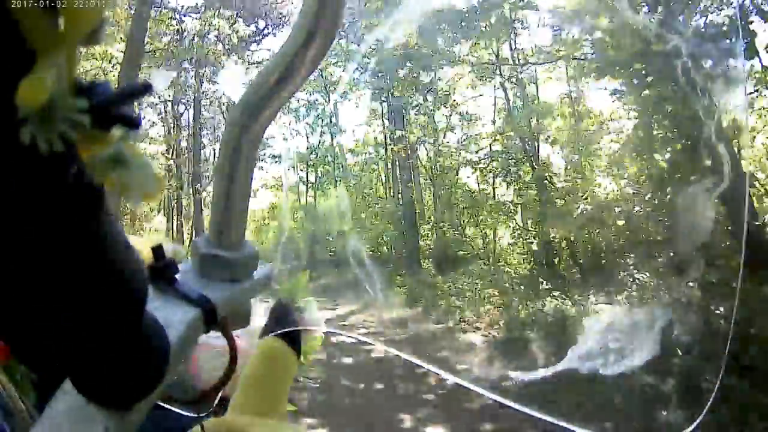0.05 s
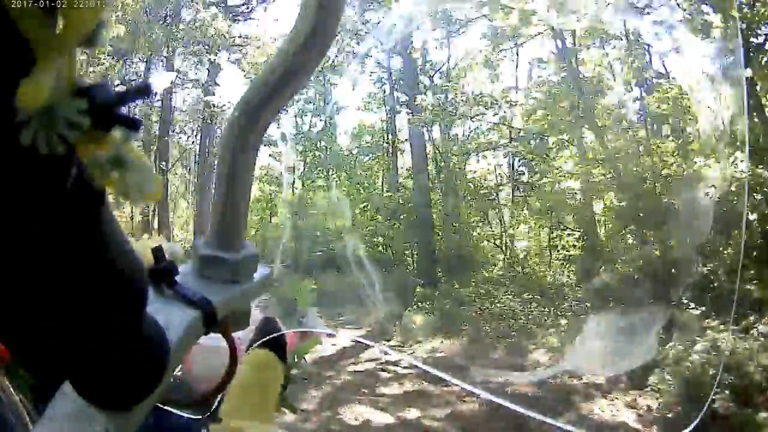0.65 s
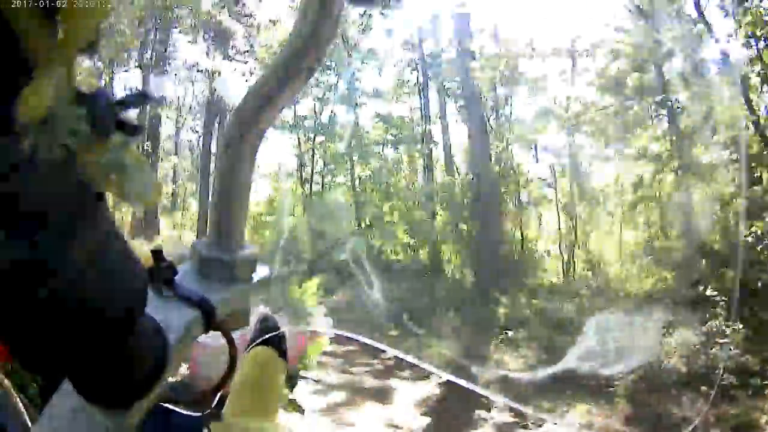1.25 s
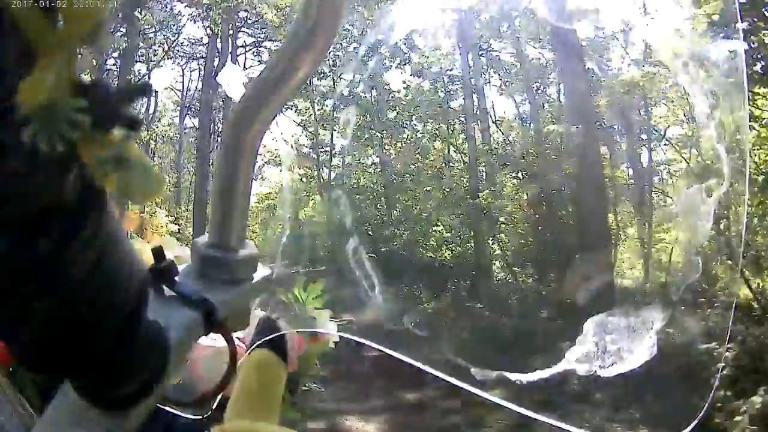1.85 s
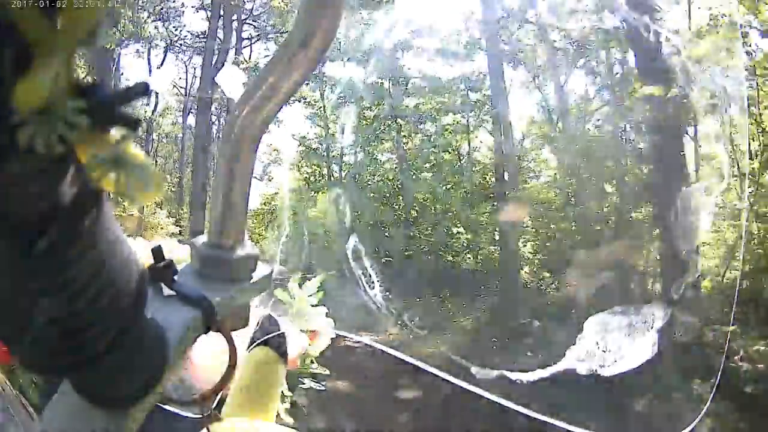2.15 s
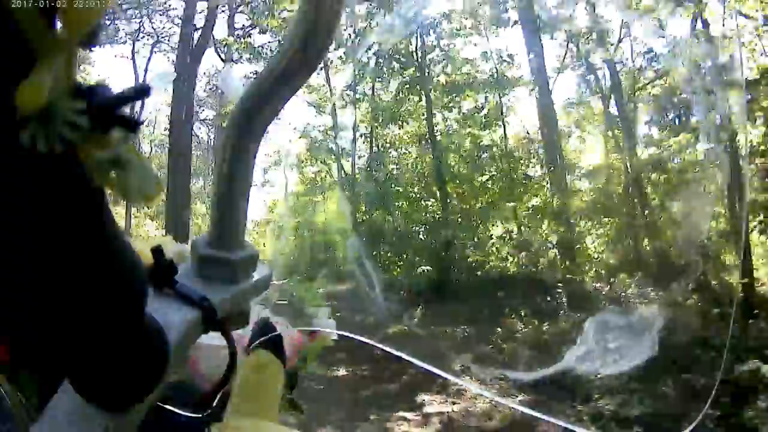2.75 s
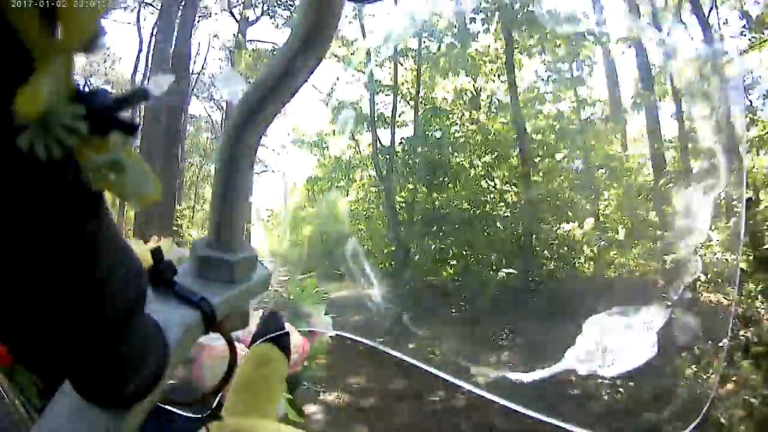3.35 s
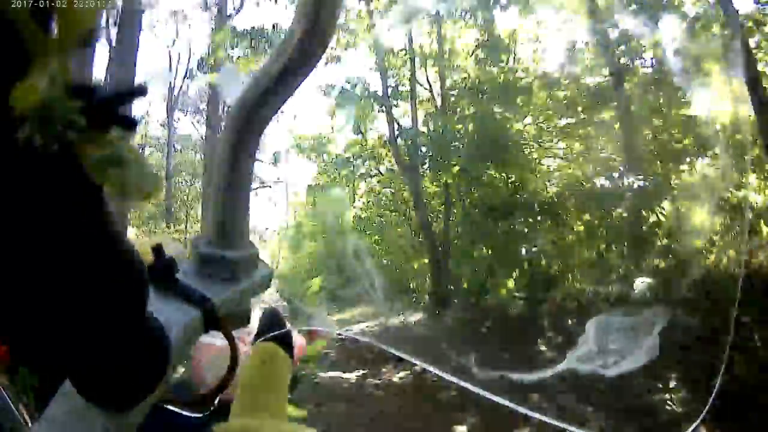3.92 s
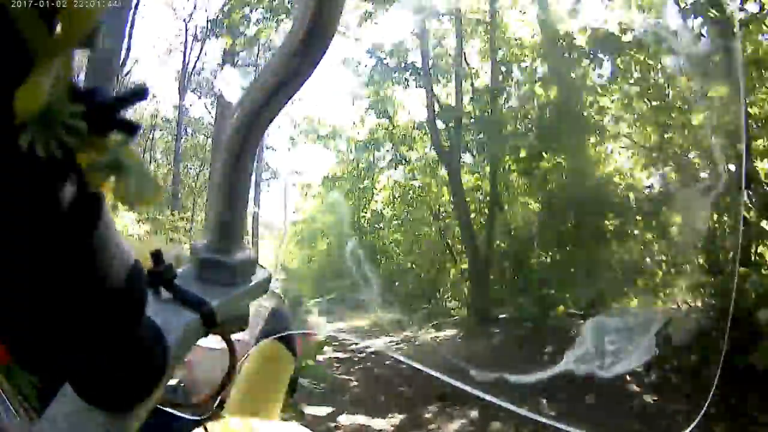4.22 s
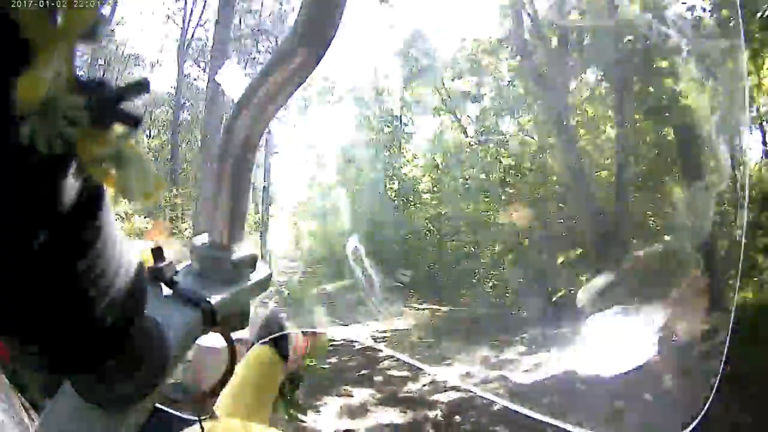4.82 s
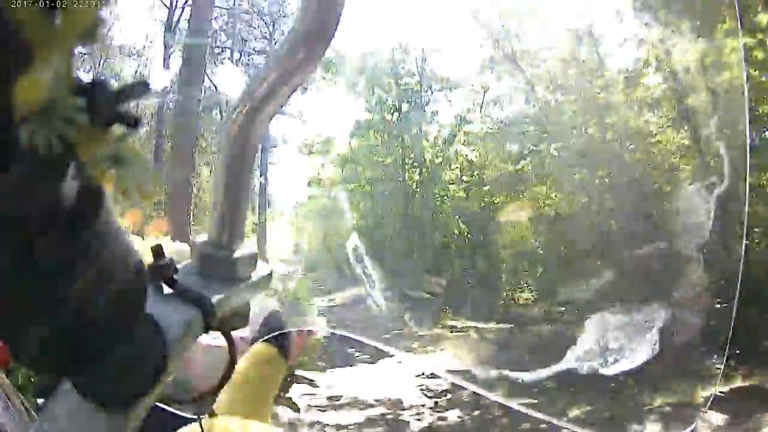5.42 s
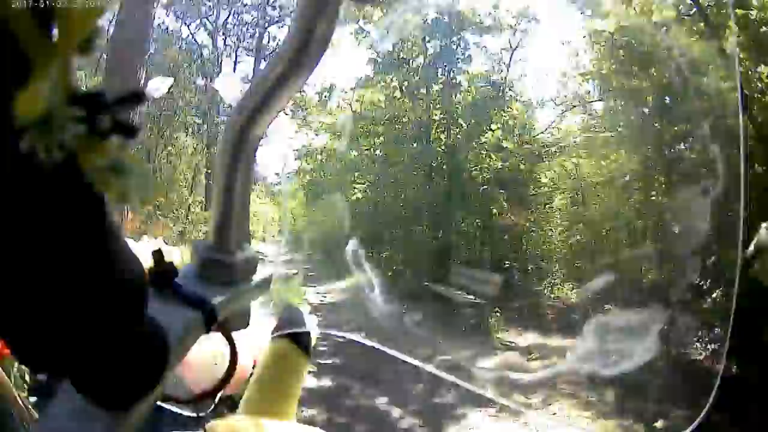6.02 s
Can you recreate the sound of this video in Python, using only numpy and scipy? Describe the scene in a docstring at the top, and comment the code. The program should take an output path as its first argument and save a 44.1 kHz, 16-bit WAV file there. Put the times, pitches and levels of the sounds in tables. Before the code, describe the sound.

A light vehicle rumbles and knocks over a bumpy dirt track while a cuckoo calls and small birds chirp faintly in the woods.

```python
"""A wood heard from a light vehicle on a dirt track. Songbirds whistle over a low rumble from the start,
and at 1 s a cuckoo hoots its two falling notes. From about 2 s bumps shake the frame into dull knocks
while the tyres hiss and flick grit. The cuckoo calls again near 4 s, amid a second run of jolts.
After 5 s the ride calms, a near bird sings and the cuckoo begins a third call.
Throughout, scattering by the trees gives each call a soft tail."""
import sys
import numpy as np
from scipy import signal
from scipy.fft import rfft, irfft
from scipy.io import wavfile
from scipy.ndimage import uniform_filter1d

SR = 44100
rng = np.random.default_rng(int(sys.argv[2]) if len(sys.argv) > 2 else 0)


def digitize_waveform(pressure):
    """Quantize a signal to 16-bit integers and store it at the path in sys.argv[1].

    Rows of a 2-D input are taken as channels; values are limited to [-1, 1].
    """
    field = np.atleast_2d(pressure).T
    bounded = np.clip(field, -1, 1)
    quanta = np.round(bounded * 32767).astype(np.int16)
    wavfile.write(sys.argv[1], SR, quanta)


N = 272097
TIME = np.arange(N) / SR

# hardest jolts of the frame: (time [s], relative peak [dB], centre frequency [Hz], shudder level [dB])
JOLTS = [(0.343, -39, 106, -44.5), (.749, -41, 104, -62), (1.41, -39, 130, -38.5), (1.734, -33, 101, -42.5),
         (1.908, -28.5, 185, -32.5), (1.978, -32, 151, -43), (2.128, -28.5, 137, -57),
         (2.222, -21.5, 180, -32), (2.248, -18.5, 256, -32), (2.275, -18.5, 170, -30),
         (2.332, -16, 255, -37), (2.345, -23.5, 220, -47), (2.473, -17, 190, -25), (2.496, -12, 183, -27.5),
         (2.506, -12, 237, -38), (2.594, -25, 157, -34), (2.617, -26, 145, -26.5),
         (2.781, -17.5, 195, -23.5), (2.856, -28, 130, -28.5), (2.935, -6, 207, -43),
         (3.029, -25, 179, -31), (3.086, -29.5, 120, -60), (3.262, -35.5, 136, -45),
         (3.39, -35.5, 107, -57), (3.435, -38.5, 105, -61), (3.806, -31.5, 191, -30),
         (3.833, -20.5, 166, -26), (3.872, -14.5, 183, -29.5), (3.99, -19, 184, -51),
         (4.001, -14, 212, -31.5), (4.05, -26.5, 117, -34), (4.246, -21, 122, -39), (4.261, -22, 230, -38),
         (4.273, -15.5, 182, -31), (4.288, -13.5, 132, -19), (4.37, -20, 147, -41), (4.478, -19, 149, -28),
         (4.555, -22.5, 161, -30), (4.58, -19.5, 157.7, -48), (4.677, -21.5, 124, -31.5),
         (4.751, -15, 184, -22), (4.82, -18.5, 232, -31), (4.831, -16, 129, -39), (5.262, -38.5, 113, -41),
         (5.434, -36.5, 98, -46), (5.755, -30, 97, -61), (6.007, -29.5, 126, -59)]


def cuckoo(waver=0.01, stop_s=0.012, echo_db=-13.5):
    """Nearly pure tones under slight frequency modulation: an arched 'cuck', then a lower, level 'oo'."""
    # (time [s], length [s], top pitch [Hz], sag at the ends [fraction], level [dB], swell [s])
    hoots = [(1.024, 0.1, 660.4, 0.2, -42.5, 0.034), (1.283, 0.18, 531.8, 0.026, -39, 0.066),
             (3.759, 0.089, 639, 0.14, -41.5, 0.068), (4.02, 0.17, 525, 0.013, -44.5, 0.033),
             (5.968, 0.094, 652, 0.074, -44, 0.069)]
    out = np.zeros(N)
    for s, length, top_hz, sag, db, swell in hoots:
        t = TIME[:round(length * SR)]
        arch = 1 - sag * abs(2 * t / length - 1) ** 3
        hz = top_hz * arch * (1 + waver * drift(45)[:len(t)])
        add(out, s, gain_of(db) * tone(hz) * fades(t, length, swell, stop_s))
    return out + gain_of(echo_db) * scatter(out, t60=.7, build_s=.005)


def song_notes():
    """Pitch contours by kind: (time [s], length [s], start, middle, end pitch [Hz], relative level [dB])."""
    # a chatterer's upward sweeps and soft arched chips: (time [s], relative level [dB])
    rasps = [(.832, -68.5), (.926, -67.5), (1.102, -67.5), (1.2, -66.5), (1.507, -63.5), (1.758, -64),
             (1.85, -59.5), (2.095, -65.5), (2.209, -63.5), (5.895, -56.5)]
    chips = [(1.396, -68), (3.89, -70), (4.125, -69), (4.39, -66)]
    # very high calls and a warbler's slurs:
    # (time [s], length [s], start pitch [Hz], end pitch [Hz], relative level [dB])
    high_calls = [(0.102, 0.091, 6780, 6810, -68), (0.453, .19, 7140, 6820, -70.5),
                  (1.382, 0.038, 6600, 6700, -70), (3.33, 0.11, 6980, 6590, -66.5),
                  (3.947, 0.12, 7000, 6230, -64.5), (4.422, 0.062, 7840, 6450, -64),
                  (4.644, 0.083, 7740, 6750, -60.5), (5.701, 0.083, 7980, 6700, -62.5)]
    slurs = [(4.746, 0.062, 2430, 3520, -61), (4.879, 0.09, 3057, 2830, -60.5),
             (4.944, .055, 2500, 2850, -62), (5.077, 0.048, 3060, 2565, -58.5),
             (5.149, 0.0586, 2427, 2853, -57.5), (5.345, 0.066, 2500, 2970, -63),
             (5.58, 0.023, 3380, 2040, -59.5), (5.754, 0.0256, 4570, 3510, -57.5)]
    # sagging whistles: (time [s], length [s], pitch [Hz], relative level [dB])
    whistles = [(0.021, 0.13, 4300, -66.5), (.042, 0.056, 2414, -63), (0.12, 0.1, 4930, -71.5),
                (0.312, 0.082, 3610, -68.5), (0.577, 0.059, 3550, -67.5), (0.817, .06, 6100, -75),
                (1.063, 0.078, 4310, -64), (1.17, 0.06, 5450, -76.5), (1.217, 0.058, 4610, -68),
                (2.159, 0.04, 5000, -63.5), (2.366, 0.08, 4440, -63.5), (2.749, 0.059, 4730, -64.5),
                (3.016, .11, 3970, -72.5), (3.949, .072, 4660, -66.5), (4.51, 0.075, 4610, -71),
                (4.858, 0.088, 4000, -66.5), (5.609, 0.059, 4790, -62.5)]
    # flicks down and back after a thin lead-in: (time [s], lead-in length [s], relative level [dB])
    flicks = [(0.831, 0.05, -59), (1.557, .008, -61), (1.918, 0.056, -62), (3.358, 0.024, -58),
              (3.766, 0.0089, -64.5), (4.13, .008, -61)]
    # the near bird's held top note, dip and loud low landing:
    # (time [s], top pitch [Hz], hold [s], landing length [s], landing pitch [Hz], relative level [dB])
    phrases = [(5.85, 5320, .028, 0.049, 3764, -50), (6.037, 5520, 0.0405, 0.088, 3636, -48.5)]
    dip_s, dip_hz, sag = .03, 4400, 0.0346
    hooks, motifs = [], []
    for s, lead, db in flicks:
        hooks += [(s - lead, lead, 4640, 4860, 4800, db - 4.5), (s, 0.0316, 5100, 4480, 4630, db)]
    for s, top_hz, hold, landing, low_hz, db in phrases:
        motifs += [(s, hold, top_hz, top_hz, top_hz, db - 7),
                   (s + hold, dip_s, top_hz, dip_hz, (top_hz + dip_hz) / 2, db - 3.5),
                   (s + hold + dip_s, landing, 3980, low_hz, low_hz - 25, db)]
    return {"rasp": [(s, .034, 2408, 2880, 3650, db) for s, db in rasps],
            "chip": [(s, 0.04, 2290, 2600, 2290, db) for s, db in chips],
            "high": [(s, length, start, end + 0.3 * (start - end), end, db)
                     for s, length, start, end, db in high_calls],
            "warble": [(s, length, start, (start + end) / 2, end, db)
                       for s, length, start, end, db in slurs],
            "whistle": [(s, length, hz * (1 + sag), hz, hz * (1 - sag), db)
                        for s, length, hz, db in whistles],
            "hook": hooks, "motif": motifs}


def songbirds(flutter_db=3, leaves_db=-7.5, wood_db=-4.0):
    """Gliding tones, randomly modulated in pitch and level, arrive directly and by scattering."""
    # kind of call: (pitch jitter [Hz], direct-path gain [ratio])
    voices = {"rasp": (384, 0.64), "chip": (210, 0.65), "high": (120, 0.43), "warble": (51, 0.55),
              "whistle": (129, 0.58), "hook": (38, 0.53), "motif": (68, .55)}
    sung, direct = np.zeros((2, N))
    jitter, flutter = drift(230), drift(83)
    for kind, notes in song_notes().items():
        jitter_hz, direct_gain = voices[kind]
        for s, length, start_hz, middle_hz, end_hz, db in notes:
            t = TIME[:round(length * SR)]
            u = t / length
            bend = 4 * u * (1 - u) * (middle_hz - (start_hz + end_hz) / 2)
            hz = start_hz + (end_hz - start_hz) * u + bend + jitter_hz * np.interp(s + t, TIME, jitter)
            level = gain_of(db + flutter_db * np.interp(s + t, TIME, flutter))
            chirp = level * fades(t, length, .35 * length, .15 * length) * tone(hz)
            add(sung, s, chirp)
            add(direct, s, direct_gain * chirp)
    leaves = gain_of(leaves_db) * scatter(sung, t60=0.11, build_s=0.0014)
    wood = gain_of(wood_db) * scatter(sung, t60=0.61, build_s=0.01)
    return gain_of(1.25) * (direct + leaves + wood)


def knocks(ring=2.46, muffle_hz=1000, bump_db=-11, bump_gap_s=0.00547, size=4096):
    """Impact: each jolt radiates a rounded pressure pulse amid four smaller bumps of the loose frame."""
    out, hz = np.zeros(N), np.fft.rfftfreq(size, 1 / SR)
    slots = (-1, 1, 2, 3)  # one bump before the pulse, three after
    for s, db, centre_hz, _ in JOLTS:
        slips, phases = rng.random((2, len(slots)))
        spectrum = (hz / centre_hz) ** ring * np.exp(-(ring + .5) * hz / centre_hz)
        spectrum /= np.sqrt(1 + (hz / muffle_hz) ** 10)
        pulse = np.fft.fftshift(np.fft.ifft(spectrum, size))  # complex, so its phase can be turned
        pulse *= gain_of(db) / abs(pulse).max()
        start = s - size / 2 / SR
        add(out, start, (pulse * np.exp(2j * np.pi * phases.sum())).real)
        for slot, slip, phase in zip(slots, slips, phases):
            bump = (pulse * np.exp(2j * np.pi * phase)).real
            delay = bump_gap_s * (slot + .5 * (slip - .5))
            add(out, start + delay, gain_of(bump_db) / abs(slot) * bump)
    return gain_of(2.5) * out


def rumble(lumpy_db=2.5, t60=0.34, rise_s=0.015):
    """Forced vibration of the frame by the track adds in power to a damped shudder after each jolt."""
    # shaking by the rough track: (time [s], relative level [dB])
    shaking = [(0, -48.5), (.2, -57), (1.2, -58.5), (1.45, -42), (1.62, -56.5), (1.9, -38), (2.07, -58),
               (2.19, -38.5), (2.4, -41), (2.65, -41), (3.07, -36), (3.18, -55.5), (3.55, -55.5),
               (3.79, -43), (3.95, -63), (4.24, -33), (4.55, -35.5), (4.63, -47), (4.7, -28.5), (5.15, -60),
               (5.33, -52), (5.95, -46), (6.17, -58)]
    # frame vibration: (frequency [Hz], relative spectral density [dB])
    spectrum = [(20, -39), (45, -20), (80, 3.5), (120, 3.5), (200, -6.5), (300, -15.5), (450, -24.5),
                (650, -33), (1000, -42), (2000, -58), (6000, -105)]
    power, t = (gain_of(-1.74) * follow(shaking)) ** 2, TIME[:SR // 2]
    for s, _, _, db in JOLTS:
        shudder = np.minimum(t / rise_s, 1) * gain_of(db - 60 * t / t60)
        add(power, s - rise_s, shudder ** 2)
    vibration = noise(spectrum, patchy_db=2.5) * gain_of(lumpy_db * drift(35))
    return np.sqrt(power) * unit_rms(vibration)


def tyres(grainy_db=1.24):
    """Crushing noise: sand and dry leaves under the tread give a fine, grainy hiss."""
    # strength of the hiss: (time [s], relative level [dB])
    hiss_levels = [(0.0, -79.5), (0.95, -81.5), (1.75, -82), (2.23, -74.5), (2.39, -68.5), (2.89, -72.5),
                   (3.14, -78.5), (3.78, -80.5), (4.59, -71.5), (5.22, -82), (6.17, -81)]
    # tread on dirt: (frequency [Hz], relative spectral density [dB])
    spectrum = [(300, 7.5), (1100, 14.5), (1500, 10), (2100, -2.5), (3000, -0.5), (5000, -1.5), (7000, 4),
                (9500, 4.5), (11000, -6), (12500, -7), (16000, -16)]
    hiss = noise(spectrum, patchy_db=1.6) * gain_of(grainy_db * drift(300))
    return gain_of(9.5) * follow(hiss_levels) * unit_rms(hiss)


def grit(rise_s=0.00067, dull_hz=10500):
    """Grit and twigs under the tyres give transients: bands of noise that decay exponentially."""
    # (time [s], level [dB], centre frequency [Hz], width [octaves], 60 dB decay time [s])
    scuffs = [(.163, -56, 10500, 0.27, 0.019), (2.42, -54.5, 4020, 1.9, 0.11),
              (2.553, -52, 1300, 0.73, 0.023), (2.779, -54, 9050, 0.37, 0.084),
              (2.957, -57.5, 5850, 1.03, 0.33), (3.038, -42.5, 8640, 0.22, 0.0066),
              (4.331, -50.5, 6600, 1.5, 0.062), (4.555, -72, 5000, 1.2, 0.027)]
    out, t = np.zeros(N), TIME[:SR // 2]
    hz = np.fft.rfftfreq(len(t), 1 / SR)
    for s, db, centre_hz, octaves, t60 in scuffs:
        band = np.exp(-.5 * (np.log2((hz + 1) / centre_hz) / octaves) ** 2) / np.sqrt(hz + 1)
        band /= np.sqrt(1 + (hz / dull_hz) ** 12)  # the microphone is dull at the very top
        snap = unit_rms(irfft(rfft(rng.standard_normal(len(t))) * band, len(t)))
        add(out, s, snap * gain_of(db - 60 * t / t60) * np.minimum(t / rise_s, 1))
    return out


def chorus():
    """Incoherent summation: far-off birds merge into a haze of high noise."""
    # strength of the haze: (time [s], level [dB])
    haze_levels = [(0, -76), (1.3, -72.5), (2.2, -74), (3.5, -79.5), (6.17, -71)]
    # distant song: (frequency [Hz], relative spectral density [dB])
    spectrum = [(1800, -38), (2400, -25), (3400, -7.5), (4400, 1), (5100, -10), (8000, -33.5)]
    return follow(haze_levels) * noise(spectrum, patchy_db=4.5)


def air(level_db=-58):
    """Broadband ambient noise: the soft, steady rush of the wood."""
    # (frequency [Hz], relative spectral density [dB])
    spectrum = [(30, 4.5), (100, -3), (250, -3.5), (450, -4.5), (750, -15), (1080, -10), (1450, -19.5),
                (2000, -26.5), (2800, -26.5), (5600, -29), (9000, -52), (11500, -39), (16000, -35)]
    return gain_of(level_db) * noise(spectrum, patchy_db=1.0)


def scatter(x, t60, build_s):
    """Multiple scattering: trunks and leaves return a cloud of echoes that builds up and dies away."""
    t = TIME[:SR]
    echoes = rng.standard_normal(SR) * (rng.random(SR) < .06)
    echoes *= gain_of(-60 * t / t60) * (1 - np.exp(-t / build_s))
    return signal.fftconvolve(x, echoes / np.linalg.norm(echoes))[:N]


def noise(spectrum, patchy_db):
    """Spectrally shaped noise of rms 1 whose level wanders in patches of time and frequency."""
    hz = np.fft.rfftfreq(2048, 1 / SR)
    real, imag, patches = rng.standard_normal((3, N // 512 + 5, len(hz)))
    patches = unit_rms(uniform_filter1d(uniform_filter1d(patches, size=7, axis=0), size=18, axis=1))
    knots_hz, knots_db = np.transpose(spectrum)
    colour_db = np.interp(np.log(hz + 1), np.log(knots_hz), knots_db)
    frames = (real + 1j * imag) * gain_of(colour_db + patchy_db * patches)
    return unit_rms(signal.istft(frames.T, nperseg=2048, noverlap=1536)[1][:N])


def drift(rate_hz):
    """Random fluctuation: low-passed noise of rms 1."""
    hz = np.fft.rfftfreq(N, 1 / SR)
    return unit_rms(irfft(rfft(rng.standard_normal(N)) * np.exp(-(hz / rate_hz) ** 2), N))


def tone(hz):
    """A sinusoid of rms 1 whose phase is the integral of frequency."""
    return unit_rms(np.sin(2 * np.pi * np.cumsum(hz) / SR))


def fades(t, length, rise, fall):
    """Amplitude envelope with quarter-sine attack and release."""
    attack = np.sin(np.pi / 2 * np.clip(t / rise, 0, 1))
    release = np.sin(np.pi / 2 * np.clip((length - t) / fall, 0, 1))
    return attack * release


def follow(curve):
    """Interpolates (time [s], level [dB]) to a gain for every sample."""
    return gain_of(np.interp(TIME, *np.transpose(curve)))


def gain_of(db):
    """Decibels to amplitude."""
    return 10 ** (np.asarray(db) / 20)


def unit_rms(x):
    """Normalises to rms 1."""
    return x / np.sqrt(np.mean(x ** 2) + 1e-20)


def add(mix, s, sound):
    """Superposes a sound on the mix at time s."""
    part = mix[max(0, round(s * SR)):][:len(sound)]
    part += sound[:len(part)]


def scene():
    """Superposition of the wood, its birds and the rolling vehicle in one channel."""
    background = air() + chorus()
    return (cuckoo() + songbirds() + knocks() + rumble() + tyres() + grit() + background)[None]


def record(dry, low_cut_hz=42, edge_hz=15800):
    """Band limiting: the small microphone loses the deepest bass, the recorder the highest treble."""
    hz = np.fft.rfftfreq(N, 1 / SR)
    thin = irfft(rfft(dry) * hz ** 2 / np.hypot(hz ** 2, low_cut_hz ** 2), N)
    low_pass = signal.firwin(511, edge_hz, window=("kaiser", 9), fs=SR)
    return signal.oaconvolve(thin, low_pass[None], "same")


dry = scene()
out = record(dry)
digitize_waveform(out)
```